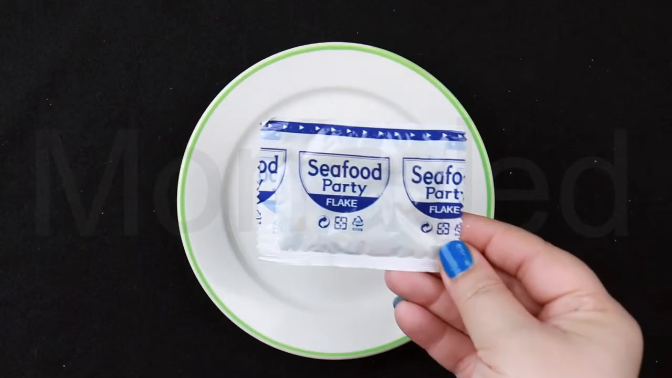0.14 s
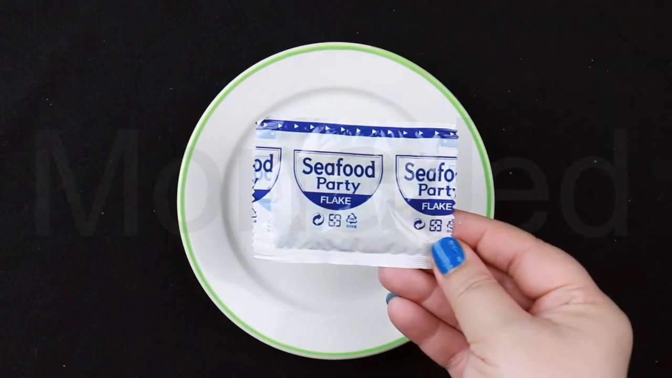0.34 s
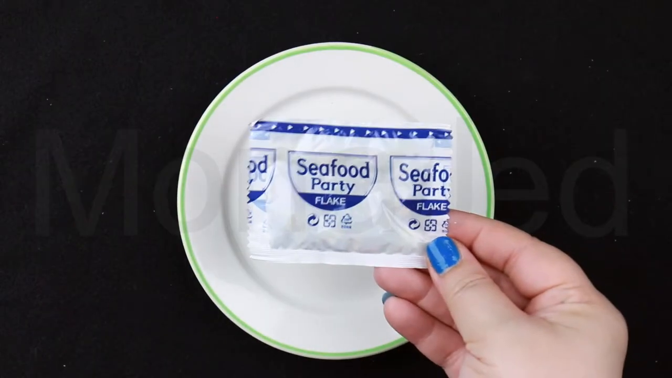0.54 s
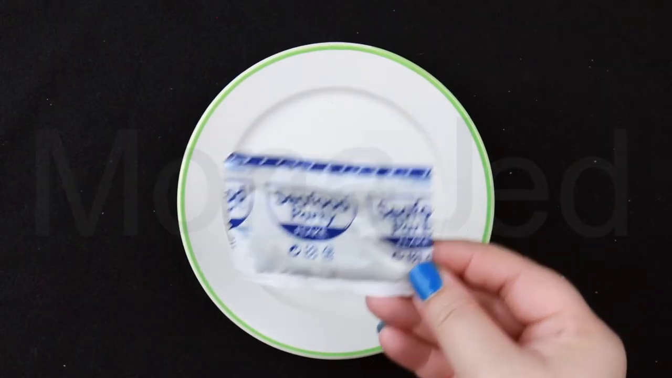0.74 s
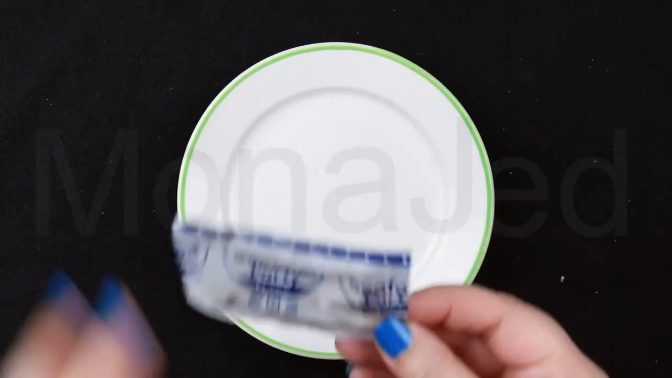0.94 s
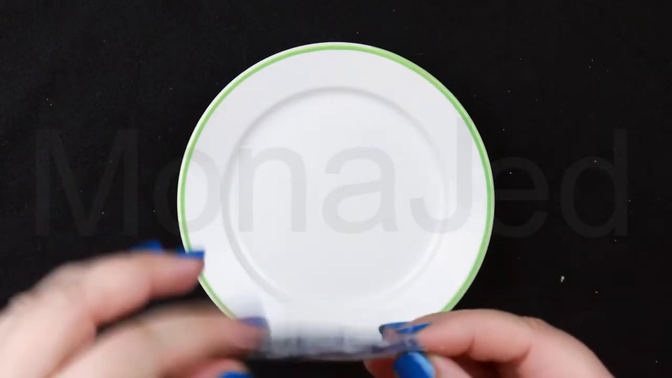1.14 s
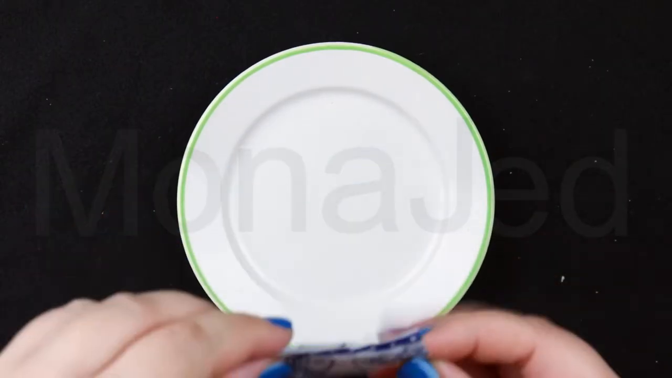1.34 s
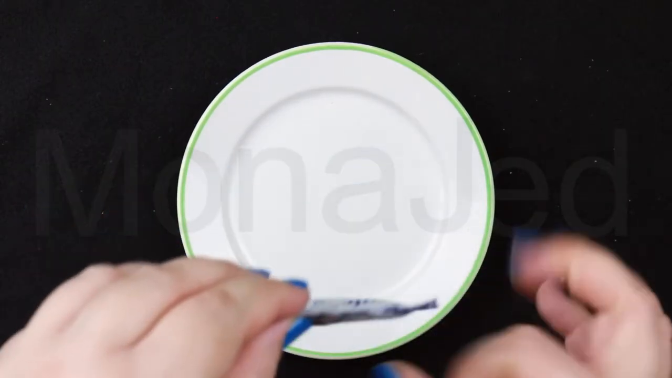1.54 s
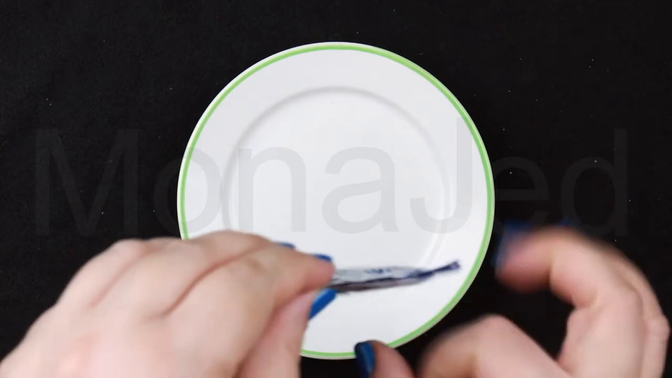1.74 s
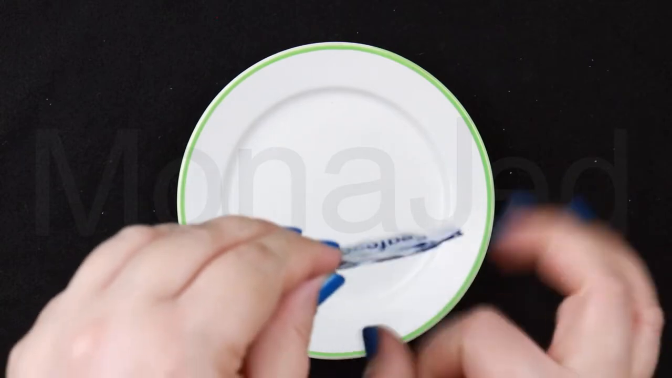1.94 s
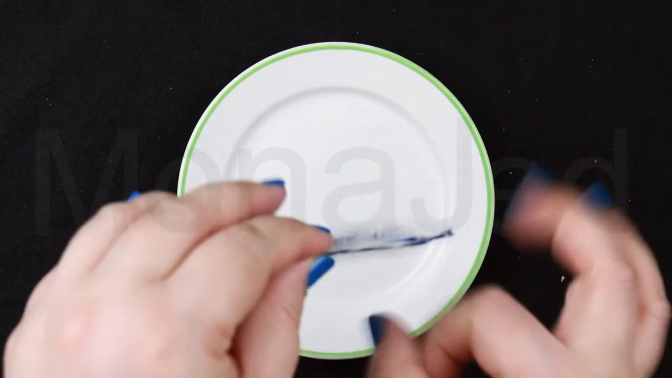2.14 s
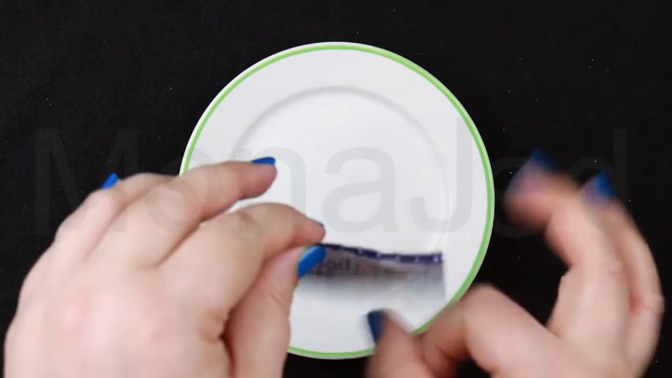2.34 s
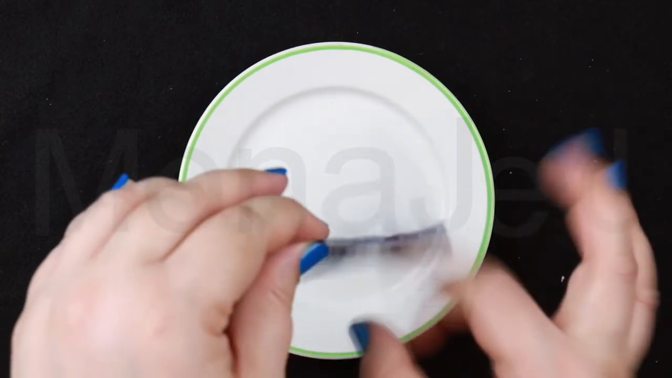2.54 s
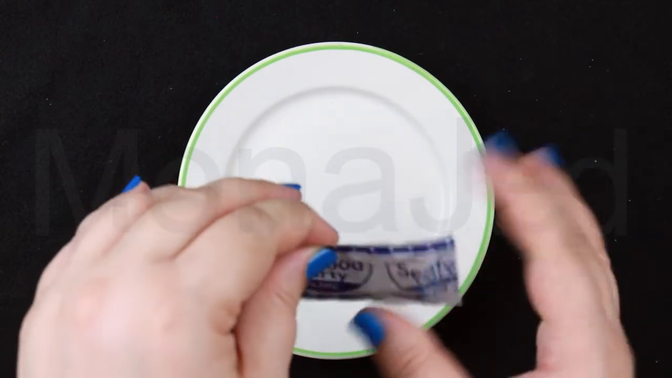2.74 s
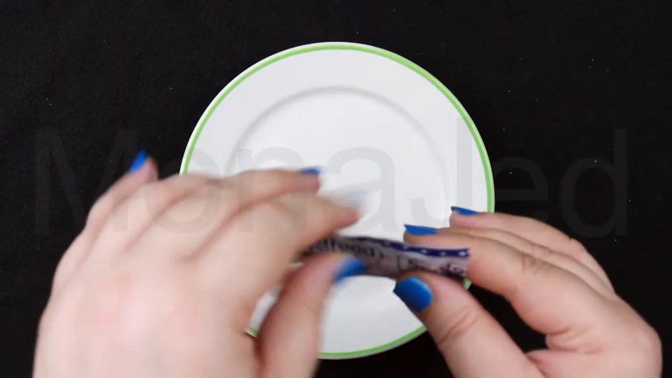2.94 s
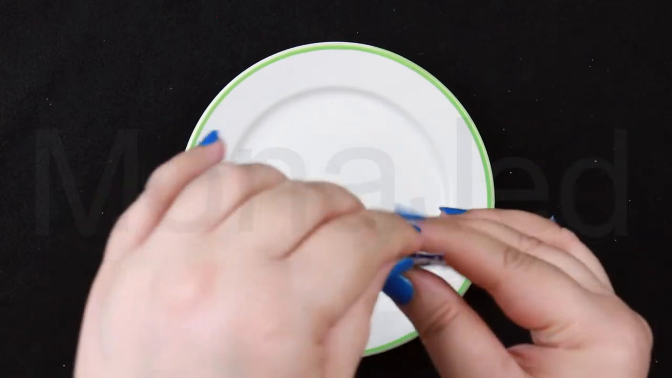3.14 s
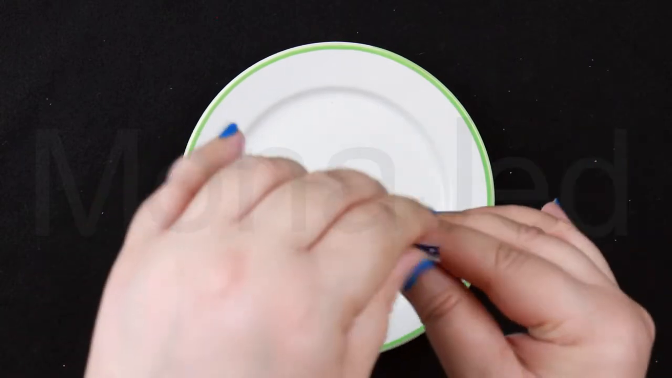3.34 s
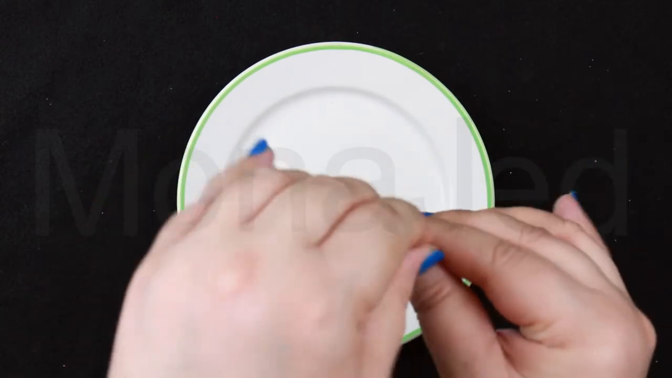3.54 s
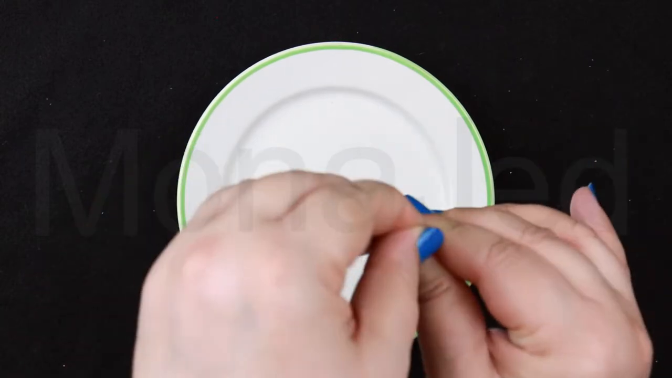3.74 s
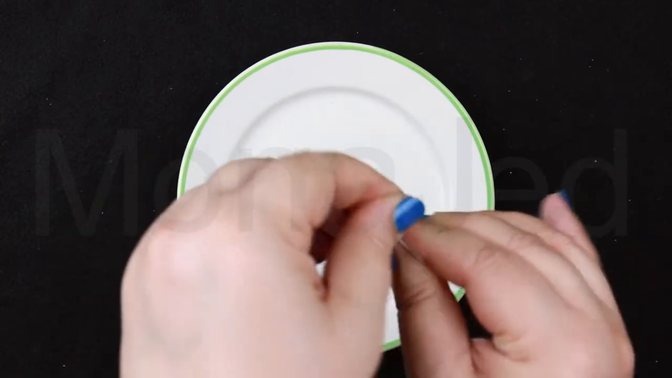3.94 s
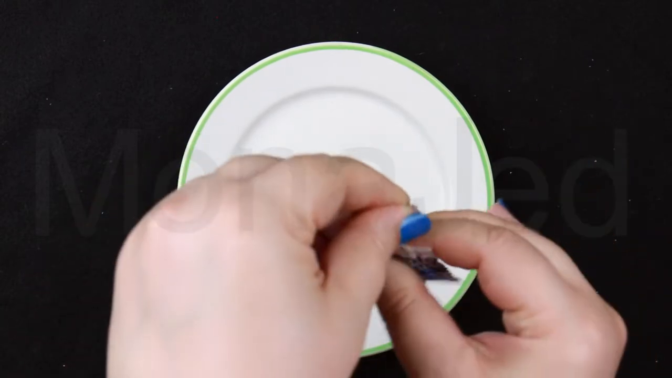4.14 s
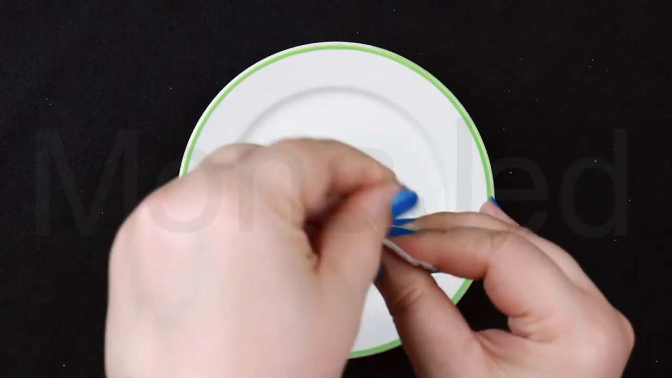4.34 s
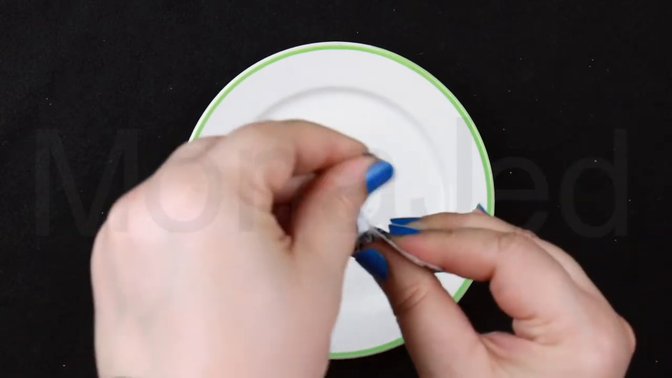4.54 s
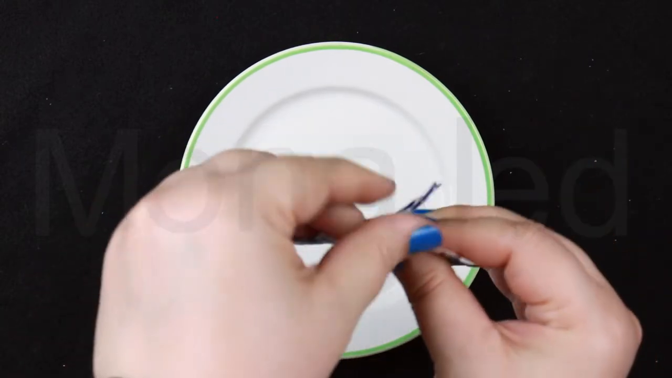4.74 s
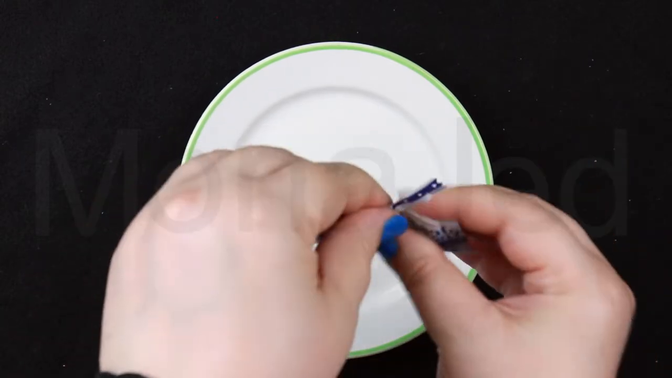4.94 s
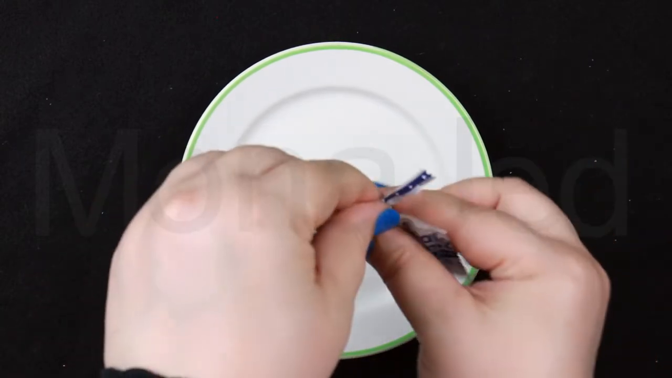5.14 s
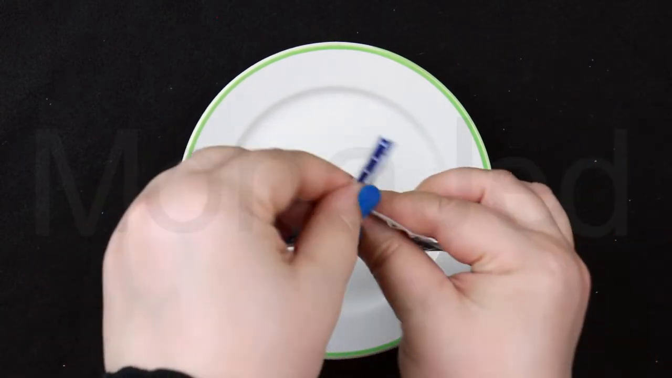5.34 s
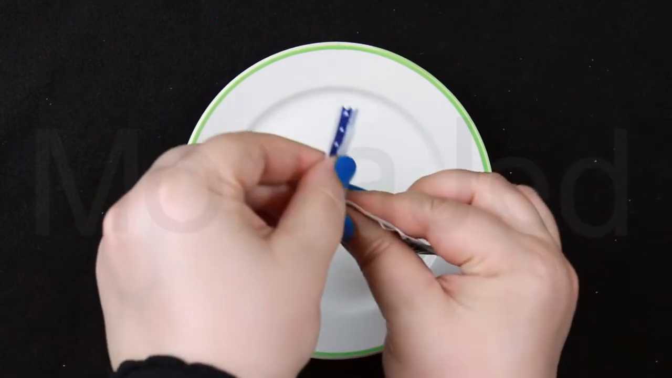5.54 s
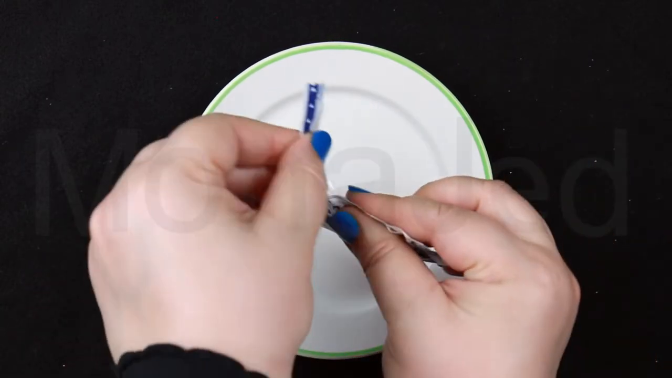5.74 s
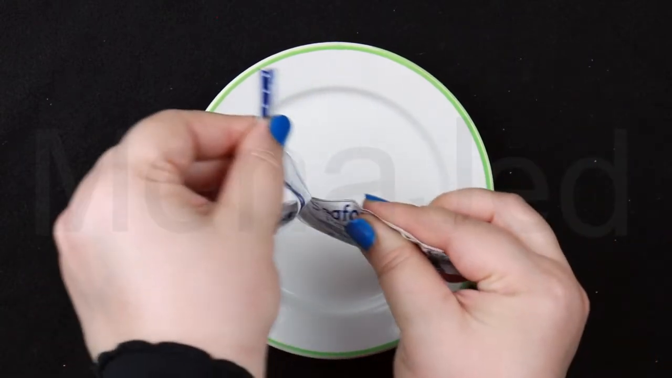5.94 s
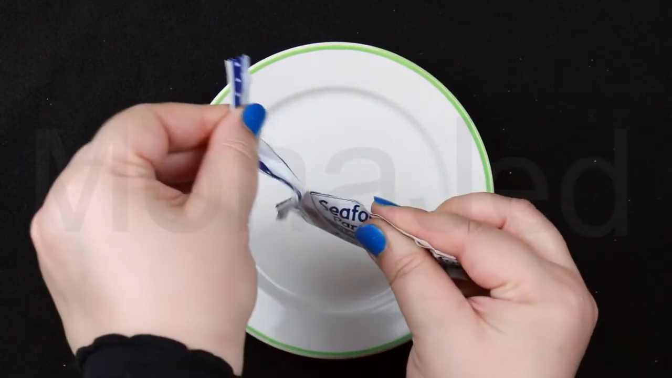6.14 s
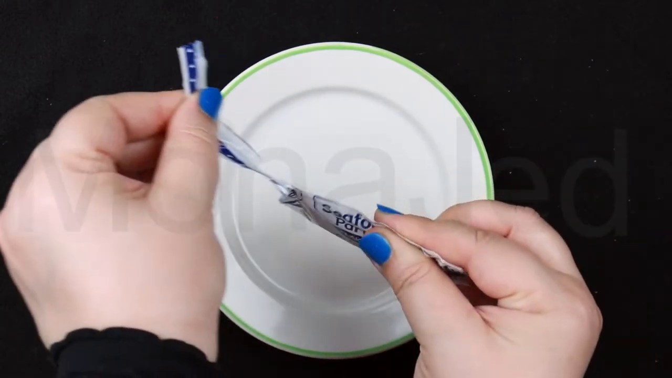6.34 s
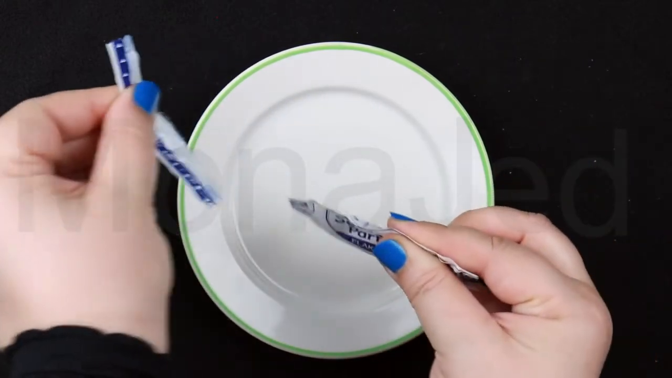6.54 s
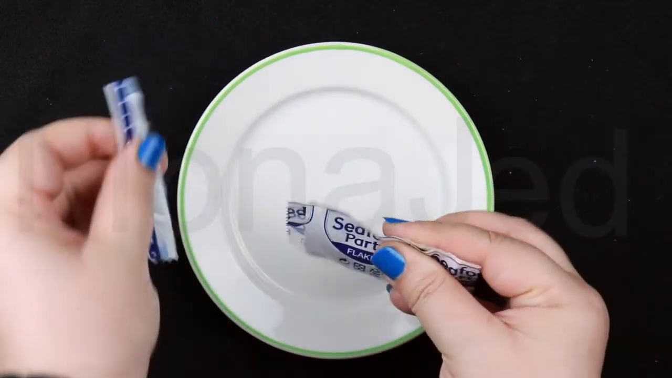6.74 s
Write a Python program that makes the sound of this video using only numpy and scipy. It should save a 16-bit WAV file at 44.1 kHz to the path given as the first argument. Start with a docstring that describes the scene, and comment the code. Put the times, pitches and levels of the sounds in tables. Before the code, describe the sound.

A small foil-plastic sachet scuffs off a plate, gets five sharp fingernail flicks with rattling flakes, then crinkles and tears open in fine crackles.

```python
"""Quiet room air with a faint low hum, then a soft scuff: a small foil-plastic sachet is slid off a plate.
It is flicked five times so that the flakes settle, then pinched and torn open along its top seam.
Buckling film and the tear are short noise bursts through resonances; rustle, flakes and rip are random grains.
Close, near-mono microphone in a small room: the sachet sits in the centre, only a trace of hiss differs
between the channels."""
import sys
import numpy as np
from scipy import signal
from scipy.fft import rfft, irfft, next_fast_len
from scipy.io import wavfile

SR = 44100
rng = np.random.default_rng(int(sys.argv[2]) if len(sys.argv) > 2 else 0)


def log_audio(samples):
    """Write samples as a 16-bit WAV file to the path given in sys.argv[1]."""
    # one column per channel
    frames = np.atleast_2d(samples).T
    # limit to full scale, then quantise
    limited = np.clip(frames, -1, 1)
    pcm = np.round(limited * 32767).astype(np.int16)
    wavfile.write(sys.argv[1], SR, pcm)


N = 303849
TIME = np.arange(N) / SR

# room air, spectrum: (frequency [Hz], relative density [dB per Hz])
AIR = [(25, -7.5), (80, -19), (150, -2), (260, 0.5), (400, 1), (800, -1), (1200, -5), (2000, -9.5),
       (4000, -15), (8000, -21), (16000, -25.5)]
# faint hum in the room: (frequency [Hz], level at the start [dB], change [dB per s])
HUM = [(83.6, -82, 0.55), (131.2, -73, 0.44)]
# hiss that differs between the channels, spectrum: (frequency [Hz], relative density [dB per Hz])
MIC_HISS = [(15, -38), (25, -8), (114, -11), (145, -14), (405, -1), (516, -5), (695, -1), (14000, -13),
            (16000, -17)]
# the room's decay: (frequency [Hz], t60 [s])
ROOM_T60 = [(200, 0.35), (1000, 0.074), (4000, 0.47), (8000, 0.33), (15000, 0.079)]
# the room's colour: (frequency [Hz], relative level [dB])
ROOM_COLOUR = [(150, 18.5), (500, 4), (1500, 10), (3500, 1.5), (6000, -3), (8500, 15), (15000, 3)]
# scuff on the plate, spectrum: (frequency [Hz], relative density [dB per Hz])
SCUFF = [(400, -32.5), (700, -14), (950, -6), (1400, -6), (2300, -8.5), (5000, -9), (8000, -20.5),
         (15000, -34)]
# crinkling film, spectrum: (frequency [Hz], relative density [dB per Hz])
FILM = [(100, -49), (900, -5.5), (1600, -10), (2400, -0.5), (3300, -2.5), (5500, 1), (7000, -6),
        (8500, -18), (12000, -9.5), (16000, -44)]
# fingertips rubbing the film, spectrum: (frequency [Hz], relative density [dB per Hz])
SKIN = [(50, -47), (150, -38), (250, -8.5), (380, 2.5), (800, 8.5), (1200, 2.5), (1900, 4.5), (3200, -23)]
# flakes striking the film, spectrum: (frequency [Hz], relative density [dB per Hz])
FLAKES = [(60, -45), (200, -16), (400, 2), (800, 10.5), (2200, 14), (3500, 12), (6000, 15.5), (8500, 3.5),
          (12000, 0), (16000, -14)]
# firmness of the hold between squeezes, as its rustle: (time [s], relative level [dB])
GRIP = [(0.55, -78.5), (1.15, -59), (1.8, -64), (2.6, -55), (3.1, -62.5), (3.7, -55.5), (4.75, -57),
        (5.5, -56.5), (6.15, -60), (6.89, -61)]
# the fingers squeeze or pull the film:
# (start [s], length [s], fine crinkle [relative dB], skin rubbing [relative dB])
SQUEEZES = [(1.193, .035, -42.5, -44), (1.285, .09, -40, -42), (1.423, .045, -46, -48.5),
            (1.671, .025, -45, -49.5), (1.863, .006, -42, -46.5), (2.383, .025, -44, -47),
            (2.417, .07, -38, -39), (2.702, .07, -47.5, -46.5), (2.953, .06, -48.5, -48),
            (3.196, .045, -48.5, -50), (3.303, .035, -43, -63), (3.585, .08, -48.5, -53.5),
            (3.857, .03, -47.5, -50), (3.98, .045, -47.5, -68), (4.096, .015, -47, -55),
            (4.165, .075, -44.5, -55), (4.465, .04, -48.5, -63), (4.623, .055, -51.5, -54),
            (4.716, .07, -60.5, -55.5), (4.868, .04, -51.5, -52), (4.996, .035, -47, -52),
            (5.15, .045, -47.5, -51.5), (5.284, 0.18, -54, -54), (5.477, .045, -48, -53),
            (5.779, .04, -49.5, -71), (5.916, .09, -46.5, -59), (6.444, .055, -50, -50),
            (6.665, .02, -48.5, -69), (6.806, .04, -48, -56.5)]
# a fingertip bumps the pouch: (time [s], level [dB], pouch mode [Hz], decay of the push [s])
BUMPS = [(1.1935, -41, 895, .008), (1.2855, -41, 990, 0.0055), (1.4097, -48, 1050, .001),
         (1.424, -41, 800, 0.0061), (3.8399, -37, 645, 0.0028), (4.096, -39, 503, 0.0066),
         (4.345, -49, 910, 0.0023), (6.5615, -43, 925, 0.0021)]
# modes of the air-filled pouch that every flick shares: (frequency [Hz], width [Hz], relative level [dB])
POUCH = [(287, 180, -14.5), (509, 240, -14)]
# a fingernail flicks the sachet:
# (time [s], level [dB], ring [Hz], second ring [Hz], its level [dB], third ring [Hz], its level [dB],
#  crumpling [dB re snap], pouch [Hz], lower pouch [Hz], its level [dB], pouch [dB re level],
#  top crack [dB re level], rise [s], decay [s])
FLICKS = [(1.8647, -20.5, 3400, 4200, -1, 6200, -5, 13, 1150, 640, -4, -10.5, -10, 0.0043, 0.0024),
          (2.058, -15, 3180, 5130, -2, 2770, -2, -1, 1250, 698, -5.5, -10, -9.5, 0.00031, 0.0019),
          (2.249, -12, 3460, 2010, -4.5, 4320, -8, 1, 775, 650, -10, -8.5, -9.5, .0014, 0.0016),
          (2.4478, -14, 5980, 4470, -6, 3020, -3.5, 17, 990, 740, -1.5, -11, -10.5, .0003, 0.0053),
          (2.6151, -13, 3520, 4260, -3.5, 7570, -12.5, 1, 1220, 835, 0.5, -10.5, -14.5, 0.00135, 0.0013)]
# the tear creeps along the seam: (start [s], end [s], relative level [dB], ring of the taut film [Hz])
RIPS = [(3.54, 3.774, -53.5, 4300), (3.94, 4.327, -56.5, 4570), (4.422, 4.577, -54, 3500),
        (5.115, 5.643, -57, 3180), (6.295, 6.547, -60, 3420)]
# two modes of the film between the fingers, which move as the grip changes and the tear lengthens:
# (start [s], end [s], lower mode [Hz], its level [dB], upper mode [Hz], its level [dB])
HOLDS = [(1.12, 1.8, 2750, -8, 4200, -29), (3.1, 3.8, 4330, -11, 5800, -14),
         (3.79, 4.595, 3660, -8, 4540, -14), (4.61, 5.66, 3180, -17, 5170, -13),
         (5.638, 6.177, 3350, -13, 5570, -10.5), (6.204, 6.89, 3450, -7.5, 5900, -13)]
# the film buckles or the tear jumps, the loudest times; the first row (0.94 s) is instead a faint tick as the
# sachet lifts off the plate; levels before the common trims in crackles(): # (time [s], relative level [dB],
# panel ring [Hz], low flex [dB], top crack [dB], run of the crease [s])
CRACKLES = [(0.9393, -49.5, 3830, -5, -28, 0.0013), (1.1298, -37.5, 2750, -6, -2, 0.0011),
            (1.1818, -45, 5020, 0, 1, 0.0051), (1.1951, -39.5, 4520, 2, 0, 0.0055),
            (1.2053, -39, 3120, 2.5, -2, 0.0085), (1.2319, -50, 2990, 6, 0, 0.0018),
            (1.2851, -32, 4150, -11, -12, 0.0058), (1.3164, -34, 5750, -20, -13, 0.0016),
            (1.3244, -33, 5840, -18, -18, 0.005), (1.3332, -39, 5680, -8, -10, 0.0015),
            (1.3618, -29.5, 4720, -9, -11, 0.0064), (1.3723, -37, 3950, -15, -3, 0.0045),
            (1.4105, -36.5, 2860, -6, -18, 0.0013), (1.4244, -41.5, 3120, -8, -3, 0.0056),
            (1.4493, -41.0, 2930, -11, -8, 0.0057), (1.4561, -44.5, 2930, -6, -12, 0.0045),
            (1.4688, -49, 2990, -13, -8, 0.0003), (1.5101, -37, 3550, -13, -7.5, 0.0065),
            (1.6251, -49.5, 2860, 1, -8, 0.0031), (1.6718, -47.5, 2410, 7.5, -2, 0.0045),
            (1.6899, -41, 3100, -11, -11, 0.0004), (1.7352, -41.5, 4520, -7.5, -3.5, 0.0035),
            (1.9226, -40, 3660, -1, -3, 0.0064), (2.1183, -40, 2780, -4, -8, 0.0029),
            (2.1503, -31, 5680, -13, -23, 0.0022), (2.1992, -39.5, 4520, -7, -7, 0.0041),
            (2.2144, -39, 4010, -7, -5, 0.0021), (2.2203, -39, 3700, -8, -3, 0.0059),
            (2.2951, -35, 4160, -18, -15, 0.0017), (2.3301, -28.5, 4470, -22, -20, 0.0012),
            (2.3656, -35.5, 4410, -5, -21, 0.0015), (2.3943, -34.5, 4610, -13, -8, 0.00024),
            (2.4221, -34.5, 4050, -19, -12, 0.0075), (2.4325, -30, 5300, -11, -10, 0.0038),
            (2.4846, -29.5, 5190, -3.5, -1, 0.005), (2.5005, -33, 5700, -19, -15, 0.00064),
            (2.5183, -39, 5790, -15, -1, 0.005), (2.5717, -52, 6090, -15, -8, 0.0003),
            (2.5929, -36, 4130, -6, -9, 0.006), (2.6012, -33.5, 5790, -12, -8, 0.0018),
            (2.6587, -47, 2430, -14, 13, 0.0016), (2.6947, -41, 3680, -15, -12, 0.0022),
            (2.6987, -41, 3250, -5, -13, 0.0048), (2.7278, -33.5, 4500, -9, -8, 0.0016),
            (2.7521, -38, 4370, -6, 2, 0.0021), (2.7701, -43, 3490, -14, -14, 0.0017),
            (2.785, -36.5, 4330, -21, -12, 0.0013), (2.8041, -42, 3850, -4, -17, 0.0016),
            (2.8935, -42, 4270, -12, -15, 0.0026), (2.9841, -45, 5120, -14, -14, 0.0021),
            (2.9936, -35.5, 4300, -11, -1, 0.0035), (3.0064, -42, 3360, -6, -17, 0.0063),
            (3.0362, -42.5, 5840, -8, -5, 0.0014), (3.1943, -39.5, 4560, -21, 0.5, 0.0022),
            (3.2162, -35, 4050, -10, -8, 0.0036), (3.2342, -41.5, 4330, -13, -12, 0.0026),
            (3.3062, -36.5, 3800, -1, -11, 0.0017), (3.3159, -37, 6160, -21, -1, 0.0015),
            (3.3225, -41, 6200, -11, -1, 0.0017), (3.3272, -37.5, 5070, -13, -8, 0.0017),
            (3.3679, -45.5, 2410, -1, -8, 0.0041), (3.434, -39.5, 5880, -18, -19, 0.00036),
            (3.4833, -39.0, 4110, -3.5, -9, 0.003), (3.5672, -42.5, 4390, -3, -12, 0.0021),
            (3.5772, -38, 4480, -13, -9, 0.0022), (3.582, -35.5, 4160, -8, -8, 0.0034),
            (3.5896, -34, 4440, -13, -4, 0.0025), (3.5999, -31.5, 4500, -25, -11, 0.0032),
            (3.6112, -39.5, 5860, -23, 6, 0.003), (3.6559, -42.5, 4480, -20, -16, 0.003),
            (3.7016, -42.5, 3730, -10, -24, 0.0035), (3.7411, -44, 3900, -12, -15, 0.0019),
            (3.7785, -34.5, 4330, -7, -19, 0.0027), (3.8411, -34.5, 4460, -5.5, -4, 0.0077),
            (3.8859, -48, 3790, -12, -9, 0.0021), (3.8932, -46, 4350, -9, 3, 0.00036),
            (3.9078, -40.5, 4440, -12, -18, 0.0026), (3.9133, -45, 2410, -2, -8, 0.0065),
            (3.9668, -36.5, 4590, -11, -5, 0.0017), (3.9751, -24.0, 4300, -27, -24, 0.0018),
            (4.0005, -46, 4630, -18, -11, 0.0004), (4.0141, -30.5, 4400, -19, -9, 0.0028),
            (4.0364, -46, 5680, -15, 0, 0.0018), (4.0955, -47, 4760, -7, 1, 0.0063),
            (4.1037, -43, 4240, -6, 1, 0.0056), (4.1293, -57, 3790, -7, -15, 0.0032),
            (4.1556, -51, 4610, 5, -16, 0.0015), (4.1797, -30.5, 3570, -8, -20, 0.0026),
            (4.1901, -34, 3680, -5, -11, 0.0015), (4.1999, -44, 4240, -19, -16, 0.0023),
            (4.2225, -46, 3620, -4, -9, 0.0021), (4.2304, -43, 4100, -6, -14, 0.0017),
            (4.2456, -40, 4500, 0.5, -8, 0.0022), (4.2832, -35, 4520, -16, -25, 0.0021),
            (4.309, -41.5, 4650, -20, -11, 0.0019), (4.3451, -38, 4760, -4.5, -6, 0.0023),
            (4.4176, -36.0, 4370, -18, -26, 0.0036), (4.4261, -45, 6050, -11, 2, 0.002),
            (4.4342, -35.5, 4670, -11, -20, 0.0012), (4.4443, -41, 4740, -7, -13, 0.0013),
            (4.4737, -36.5, 3620, -13, -9, 0.0019), (4.4824, -45, 3640, -8, -10, 0.0015),
            (4.4899, -40, 3640, -1, -1, 0.0015), (4.498, -38.5, 3770, -5, -2, 0.0014),
            (4.5055, -37.5, 3620, -9, -20, 0.0012), (4.5227, -44, 3920, -4, -13, 0.0022),
            (4.5521, -41, 3730, -3, -1, 0.0036), (4.5755, -50, 3920, -3, -15, 0.0015),
            (4.6167, -44.0, 3850, -1, -9, 0.0031), (4.642, -40.5, 5600, -8, -13, 0.0033),
            (4.6676, -44.5, 3920, 1, 2, 0.002), (4.6911, -41, 6200, -21, -4, 0.0028),
            (4.8087, -53, 3940, -13, -12, 0.0019), (4.8257, -49, 3320, -3, 0, 0.0024),
            (4.8536, -36.5, 4300, -10, -7, 0.002), (4.8838, -36, 4080, -4, -10, 0.0018),
            (4.9273, -54, 3130, -7, 5, 0.0025), (4.9371, -50, 6520, -14, 3, 0.0004),
            (4.9418, -39.5, 5680, -6, -13, 0.0018), (4.9595, -40.5, 4690, -10, -3, 0.0018),
            (5.0183, -41.5, 3360, 0, -5, 0.0051), (5.0241, -35, 5500, -5, -19, 0.002),
            (5.0897, -45.5, 3960, -8, -25, 0.0026), (5.1294, -44, 3320, -10, -16, 0.0033),
            (5.1554, -40.5, 3190, -18, -17, 0.0015), (5.1679, -47, 2950, -11, -21, 0.0011),
            (5.1808, -37, 4330, -6, -6, 0.0027), (5.2073, -44, 5900, -6, -9, 0.0017),
            (5.2115, -42, 2990, -3, -8, 0.0014), (5.2452, -44, 3250, -8, -14, 0.0023),
            (5.2594, -43, 3080, -19, -12, 0.0027), (5.2896, -47, 3380, -2, -5, 0.0029),
            (5.3174, -38.5, 2860, -4, -6, 0.0037), (5.3338, -50, 3080, -10, -22, 0.0013),
            (5.3539, -43.5, 3510, -7, 2, 0.0029), (5.3861, -49, 2930, 2, -14, 0.0018),
            (5.3937, -35, 3100, -8, -10, 0.0017), (5.3976, -39, 3170, -11, -15, 0.0035),
            (5.427, -41, 3170, -12, -11, 0.004), (5.4326, -40, 3360, -21, -9, 0.0028),
            (5.4739, -38, 3400, 0, -12, 0.0028), (5.4777, -34, 3140, -12, -5, 0.0028),
            (5.4854, -49, 4240, -16, 3, 0.0022), (5.5063, -33.5, 3010, -1, -25, 0.0029),
            (5.5406, -51, 3140, -16, -16, 0.0019), (5.5629, -33.0, 5210, -15, -19, 0.00069),
            (5.5676, -29.5, 5160, -26, -7, 0.0017), (5.5744, -31, 3460, -10.5, -17, 0.0011),
            (5.5912, -41, 5230, -22, 4, 0.00095), (5.604, -34.5, 6440, -7, -8, 0.0037),
            (5.6106, -36.5, 3320, 0.5, -9, 0.0015), (5.6308, -41.5, 5230, -13, -18, 0.0011),
            (5.7184, -48, 5040, -1, -17, 0.0032), (5.7668, -28.0, 3450, -12.5, -9.5, 0.003),
            (5.793, -33.5, 4100, -17, -3.5, 0.0006), (5.8175, -46, 3380, -13, -10, 0.0014),
            (5.8235, -53, 5770, -13, -9, 0.0009), (5.8355, -54, 5000, -15, 0, 0.0009),
            (5.8896, -39.0, 3450, -11, -4, 0.0012), (5.8932, -46, 3210, -3, -4, 0.0032),
            (5.911, -38.0, 3770, -5, -14, 0.0011), (5.9241, -39, 6090, -3, -11, 0.0029),
            (5.93, -40.5, 5600, -6, -5, 0.0004), (5.9561, -40.5, 5770, 3, -7, 0.0027),
            (5.9669, -37.5, 5960, -12, 2.5, 0.0019), (5.993, -40, 3210, 1.5, -15, 0.0011),
            (6.0224, -45, 4670, 0, -1, 0.0017), (6.0391, -42.5, 4350, -6, -16, 0.0012),
            (6.0728, -42.5, 4350, -14, -3, 0.005), (6.0934, -49.5, 3790, -16, -11, 0.0012),
            (6.1506, -46.0, 4500, -4, -10, 0.0028), (6.2272, -51.0, 4460, -5, -1, 0.0019),
            (6.2413, -50.0, 3830, -1, -5, 0.00042), (6.3058, -39.5, 3800, -11, -4, 0.0012),
            (6.3201, -39.5, 3600, -13, -18, 0.0015), (6.3465, -39.5, 3530, -4, -4, 0.0025),
            (6.3575, -36.5, 3370, -4.5, -28, 0.0021), (6.4069, -48.5, 3570, 3, -5, 0.0013),
            (6.4387, -35.0, 2360, -3.5, -19, 0.00074), (6.4586, -45.0, 3790, -6, -3, 0.0043),
            (6.4914, -40.5, 3620, -5, -5, 0.0046), (6.5054, -45.0, 3210, 1, -8, 0.0011),
            (6.5307, -52, 4720, -10, -7, 0.0012), (6.5609, -46.5, 2410, 7.5, -31, 0.0027),
            (6.5889, -48, 3680, 2, -9, 0.0021), (6.6641, -48, 4460, -1, -9, 0.0035),
            (6.6737, -48.5, 4630, -1, 2, 0.0054), (6.7532, -39, 4630, -17, -14, 0.0017),
            (6.8107, -34, 6060, -2.5, -3, 0.0042), (6.8698, -47.5, 5600, -3, 1, 0.0027)]

AIR_DB, HISS_DB = -56, -64
SLIDE_START_S, SLIDE_LENGTH_S, SLIDE_ATTACK_S, SLIDE_RELEASE_S = 0.755, 0.1, 0.036, 0.042
SQUEEZE_ATTACK_S, SQUEEZE_RELEASE_S = 0.012, 0.024
GRIP_RUB_DB = 1.5  # rubbing relative to crinkle in the steady hold
# fine crinkle: tick rate, unevenness of the sizes, decay of each tick, smooth share, wavering of the pressure
TICKS_PER_S, TICK_SPREAD_DB, TICK_S, FRICTION_SHARE, PATCHY_DB = 800, 5.8, 0.0006, 0.22, 1.5
# even rustle after a flick: levels relative to the flick
FLUTTER_CRINKLE_DB, FLUTTER_RUB_DB, FLUTTER_S = -28.5, -29, 0.074
FLUTTER_PER_S, FLUTTER_SPREAD_DB = 5000, 2.5
# flakes pattering down, and the moment they need to reach the film after the nail
PATTER_PER_S, PATTER_SPREAD_DB, FLAKE_FLIGHT_S = 900, 4.5, 0.004
# the pinched seam strains before it gives way
STRAIN_START_S, STRAIN_LENGTH_S, STRAIN_ATTACK_S, STRAIN_RELEASE_S = 3.93, 0.53, 0.23, 0.15
# the dented film pops back after a flick: levels relative to the flick
RELAX_COUNT, RELAX_FIRST_S, RELAX_LAST_S = 12, 0.012, 0.12
RELAX_DB, RELAX_DB_PER_S, RELAX_RUN_S = -40, -78, 0.00065
JUMPS_PER_S, JUMP_SPREAD_DB = 260, 5.5  # jumps of the tear
LESSER_COUNT, LESSER_SPREAD_DB, LESSER_RING_HZ, LESSER_RUN_S = 170, 3, 3800, 0.00088
LOWEST_HZ = 150  # the small sachet radiates little bass below this
CUTOFF_HZ = 16100


def from_db(db):
    """Decibels to gain."""
    return 10 ** (np.asarray(db) / 20)


def rms_one(x):
    """Scale to rms 1."""
    return x / np.sqrt(np.mean(x ** 2) + 1e-20)


def in_time(rows):
    """Each column of a curve, sample by sample."""
    s, *columns = np.transpose(rows)
    return [np.interp(TIME, s, column) for column in columns]


def at_hz(points, hz):
    """Read a spectrum on a log-frequency axis."""
    f, value = np.transpose(points)
    return np.interp(np.log(np.maximum(hz, 1)), np.log(f), value)


def coloured(x, spectrum):
    """Give a steady signal a spectrum; rms 1."""
    size = next_fast_len(len(x))
    gain = from_db(at_hz(spectrum, np.fft.rfftfreq(size, 1 / SR)))
    return rms_one(irfft(rfft(x, size) * gain, size)[:len(x)])


def band(x, low_hz, high_hz, order=2):
    """Causal band-pass."""
    return signal.sosfilt(signal.butter(order, [low_hz, high_hz], "band", fs=SR, output="sos"), x)


def resonance(x, hz, width_hz):
    """One resonance, gain 1 on top."""
    r = np.exp(-np.pi * width_hz / SR)
    feedback = [1, -2 * r * np.cos(2 * np.pi * hz / SR), r * r]
    return signal.lfilter(np.array([1, 0, -1]) * (1 - r * r) / 2, feedback, x)


def drift(rate):
    """Slow chance with spread 1, from random knots at a rate per second."""
    knots = rng.standard_normal(4096)
    return rms_one(np.interp(TIME * rate, np.arange(len(knots)), knots))


def as_hit(x):
    """Scale each short sound to the energy of 4 ms at rms 1."""
    energy = np.sum(x ** 2, axis=-1, keepdims=True)
    return x * np.sqrt(0.004 * SR / (energy + 1e-20))


def add(out, s, sound):
    """Mix a sound in at a time."""
    i = max(round(s * SR), 0)
    out[i:i + len(sound)] += sound[:max(N - i, 0)]


def grains(per_s, spread_db):
    """Random single-sample clicks of either sign; a wider spread makes their sizes less even."""
    sizes = from_db(spread_db * np.minimum(rng.exponential(1, N), 4))
    return (rng.random(N) < per_s / SR) * sizes * rng.choice([-1, 1], N)


def swell(start_s, length_s, attack_s, release_s):
    """Grow exponentially to 1, hold, die away."""
    outside = np.maximum((start_s - TIME) / attack_s, (TIME - start_s - length_s) / release_s)
    return np.exp(-np.clip(outside, 0, 20))


def driven(force, modes, rough_db=0, lag_cycles=0.45):
    """Modes (Hz, width Hz, dB) with deep valleys between them: the film snaps through at the height of the force,
    its low modes last, amid rough crumpling."""
    out = 0
    for hz, width, db in modes:
        lag = round(lag_cycles * SR / hz)
        snap = np.arange(len(force)) == np.argmax(force) + lag
        pushes = np.array([snap, rng.standard_normal(len(force)) * force])
        ring, crumpling = as_hit(resonance(resonance(pushes, hz, width), hz, width))
        out = out + from_db(db) * as_hit(ring + from_db(rough_db) * crumpling)
    return out


def background():
    """Shaped noise for room air, narrow noise for low hum, and hiss of opposite sign in the two channels."""
    out = from_db(AIR_DB) * coloured(rng.standard_normal(N), AIR)
    for hz, db, db_per_s in HUM:
        hum = resonance(resonance(rng.standard_normal(N), hz, 25), hz, 25)
        out += from_db(db + db_per_s * TIME) * rms_one(hum)
    hiss = from_db(HISS_DB) * coloured(rng.standard_normal(N), MIC_HISS)
    return out + hiss * np.array([[1], [-1]])


def room(x, near_db=-15, near_s=0.0024, far_db=-13):
    """Plate, hands and table scatter the sound at once; the walls add a short tail."""
    t = TIME[:SR // 2]
    edges = np.geomspace(100, 17000, 10)
    tail = 0
    for low, high in zip(edges, edges[1:]):
        hz = np.sqrt(low * high)
        fading = from_db(at_hz(ROOM_COLOUR, hz) - 60 * t / at_hz(ROOM_T60, hz))
        tail = tail + band(rng.standard_normal(len(t)), low, high) * fading
    tail = tail * (t > 0.005)
    scatter = rng.standard_normal(len(t)) * (t > 0.0015) * np.exp(-t / near_s)
    near = band(scatter, 160, 7600, order=1)
    echoes = from_db(near_db) * near / np.linalg.norm(near) + from_db(far_db) * tail / np.linalg.norm(tail)
    return signal.fftconvolve(x, echoes)[:N]


def slide(scuff_db=-52.5, hollow_db=-51.5, gap_hz=900, rise_hz_per_s=3200, gap_width_hz=650):
    """The sachet scuffs softly across the glazed plate; the hollow under it rises in pitch as it lifts."""
    touching = swell(SLIDE_START_S, SLIDE_LENGTH_S, SLIDE_ATTACK_S, SLIDE_RELEASE_S)
    hz = gap_hz + rise_hz_per_s * np.clip(TIME - SLIDE_START_S, 0, SLIDE_LENGTH_S)
    # low-passed grains on a gliding carrier make a moving band of noise
    lowpass = signal.butter(2, gap_width_hz / 2, fs=SR, output="sos")
    ringing = signal.sosfilt(lowpass, grains(per_s=17000, spread_db=0.5))
    hollow = ringing * np.sin(2 * np.pi * np.cumsum(hz) / SR)
    scuff = coloured(grains(per_s=6500, spread_db=2), SCUFF)
    return touching * (from_db(scuff_db) * scuff + from_db(hollow_db) * rms_one(hollow))


def finger_work():
    """Gains of crinkle and rubbing: the powers of the steady hold and each squeeze add up."""
    grip, = in_time(GRIP)
    power = from_db([grip, grip + GRIP_RUB_DB]) ** 2
    for s, length, crinkle_db, rub_db in SQUEEZES:
        squeeze = swell(s, length, SQUEEZE_ATTACK_S, SQUEEZE_RELEASE_S)
        power += (from_db([[crinkle_db], [rub_db]]) * squeeze) ** 2
    return np.sqrt(power)


def handling(crinkle_gain, rub_gain):
    """Tiny creases tick in the film while the fingertips rub over it; every tick is a very short run of slips."""
    starts = np.abs(grains(TICKS_PER_S, TICK_SPREAD_DB)) + 1e-18
    ticks = signal.lfilter([1], [1, -np.exp(-1 / (TICK_S * SR))], starts)
    friction = rms_one(rms_one(ticks) + FRICTION_SHARE)
    crinkle = coloured(friction * rng.standard_normal(N), FILM) * crinkle_gain
    rub = coloured((friction + 0.64) * rng.standard_normal(N), SKIN) * rub_gain  # rubbing is smoother
    return (crinkle + rub) * from_db(PATCHY_DB * drift(45))


def flutter():
    """After each flick the film rustles on in dense, even grains and dies away."""
    gain = 0
    for s, db, *_, rise, decay in FLICKS:
        gain = gain + from_db(db) * swell(s + rise, decay, rise, FLUTTER_S)
    crinkle = from_db(FLUTTER_CRINKLE_DB) * coloured(grains(FLUTTER_PER_S, FLUTTER_SPREAD_DB), FILM)
    rub = from_db(FLUTTER_RUB_DB) * coloured(grains(FLUTTER_PER_S, FLUTTER_SPREAD_DB), SKIN)
    return gain * (crinkle + rub)


def flakes(shake_db=-4.5, shake_s=0.012, settle_db=-28, settle_s=0.13):
    """Each flick throws the flakes against the film in a dense rush; they patter back down more sparsely."""
    thrown, falling = np.zeros((2, N))
    t = TIME[:SR // 2]
    arriving = 1 - np.exp(-(t / FLAKE_FLIGHT_S) ** 2)
    for s, db, *_, rise, decay in FLICKS:
        add(thrown, s + rise, from_db(db + shake_db) * arriving * np.exp(-t / shake_s))
        add(falling, s + rise, from_db(db + settle_db) * np.exp(-t / settle_s))
    rush = coloured(grains(per_s=5100, spread_db=2.5), FLAKES)
    patter = coloured(grains(PATTER_PER_S, PATTER_SPREAD_DB), FLAKES)
    return thrown * rush + falling * patter


def bumps(width_hz=480, rough_db=-2):
    """A soft fingertip knocks the air-filled pouch: a decaying push rings one mode."""
    t = TIME[:SR // 20]
    out = np.zeros(N)
    for s, db, hz, decay in BUMPS:
        knock = driven(np.exp(-t / decay), [(hz, width_hz, 0)], rough_db)
        add(out, s, from_db(db) * as_hit(band(knock, 320, 1650)))
    return out


def strain(level_db=-58.5, hz=410, width_hz=300):
    """The taut seam creaks dully between the fingertips: grains through a low resonance."""
    pinched = swell(STRAIN_START_S, STRAIN_LENGTH_S, STRAIN_ATTACK_S, STRAIN_RELEASE_S)
    creak = band(resonance(grains(per_s=280, spread_db=0.5), hz, width_hz), 290, 540)
    return pinched * from_db(level_db) * rms_one(creak)


def flicks(ring_width_hz=850, broad_db=-12, pouch_width_hz=420, graze_db=-30, graze_s=0.0016):
    """The nail grazes the film, crumples it in a few ms and thumps the air-filled pouch."""
    t = np.arange(round(0.05 * SR)) / SR - graze_s
    out = np.zeros(N)
    for (s, db, hz, second_hz, second_db, third_hz, third_db, rough_db,
         pouch_hz, lower_hz, lower_db, low_db, top_db, rise, decay) in FLICKS:
        press = np.maximum(t / rise, from_db(graze_db))
        force = np.minimum(press, np.exp((rise - t) / decay))
        crumple = rng.standard_normal(len(t)) * force
        modes = [(hz, ring_width_hz, 0), (second_hz, ring_width_hz, second_db),
                 (third_hz, ring_width_hz, third_db)]
        ring = band(driven(force, modes, rough_db), 690, 10000)
        panel = as_hit(ring + from_db(broad_db) * as_hit(band(crumple, 2400, 6200)))
        knock = list(POUCH) + [(pouch_hz, pouch_width_hz, 0), (lower_hz, pouch_width_hz, lower_db)]
        pouch = as_hit(band(driven(force, knock, rough_db=-3.5, lag_cycles=0.35), 225, 1800))
        crack = as_hit(band(crumple, 7500, 11600))
        add(out, s - graze_s, from_db(db) * (panel + from_db(low_db) * pouch + from_db(top_db) * crack))
    return out


def relaxing(spread_db=4.0, ring_hz=4200, ring_octaves=0.35, flex_db=-9, crack_db=-8):
    """Rows like CRACKLES: the dented film pops back in ticks, sparser and on average softer as it settles."""
    rows = []
    for s, db, *_ in FLICKS:
        for k in range(RELAX_COUNT):
            step = (k + rng.random()) / RELAX_COUNT
            wait = RELAX_FIRST_S * (RELAX_LAST_S / RELAX_FIRST_S) ** step
            size, ring = rng.standard_normal(2)
            level = db + RELAX_DB + RELAX_DB_PER_S * wait + spread_db * size
            hz = ring_hz * 2 ** (ring_octaves * ring)
            rows.append((s + wait, level, hz, flex_db, crack_db, RELAX_RUN_S))
    return rows


def rips(ring_width_hz=700, dry_db=-8, fade_s=0.025, strip_hz=1720, strip_width_hz=600, strip_db=-7):
    """The tear advances in tiny jumps, each plucking the taut film and the loose strip: a fine rasp."""
    jumps = band(grains(JUMPS_PER_S, JUMP_SPREAD_DB), 1200, 7200)
    strip = rms_one(resonance(jumps, strip_hz, strip_width_hz))
    loose = from_db(strip_db) * strip + from_db(dry_db) * rms_one(jumps)
    out = np.zeros(N)
    for start, end, db, hz in RIPS:
        pull = np.clip(np.minimum(TIME - start, end - TIME) / fade_s, 0, 1)
        taut = rms_one(resonance(jumps, hz, ring_width_hz))
        out += pull * from_db(db) * (taut - loose)
    return out


def lesser_crackles(work, level_db=-54, follows=0.15, ring_octaves=0.21, flex_db=-8, crack_db=-9,
                    colour_db=1.5, busy_db=-49):
    """Rows like CRACKLES, by chance: harder work makes them more frequent and louder, up to a limit."""
    effort = np.minimum(work / from_db(busy_db), 1)
    chance = np.cumsum(effort)
    draws = (np.arange(LESSER_COUNT) + rng.random(LESSER_COUNT)) / LESSER_COUNT
    at = np.searchsorted(chance, chance[-1] * draws)
    size, ring, flex, crack = rng.standard_normal((LESSER_COUNT, 4)).T
    db = level_db + follows * 20 * np.log10(effort[at]) + LESSER_SPREAD_DB * size
    hz = LESSER_RING_HZ * 2 ** (ring_octaves * ring)
    run = np.full(LESSER_COUNT, LESSER_RUN_S)
    return np.transpose([TIME[at], db, hz, flex_db + colour_db * flex, crack_db + colour_db * crack, run])


def crackles(rows, snap=2.6, after_s=0.018, after_db=-24, ring_width_hz=1100,
             ring_db=1, flex_db=2, crack_db=-0.5):
    """The film snaps, a crease runs across it for a few ms at most, and the freed panel rings briefly."""
    t = np.arange(round(0.016 * SR)) / SR
    runs = np.maximum(np.array(rows)[:, 5:], 1 / SR)  # short creases snap, long ones zip
    fading = np.exp(-(t / runs) ** 2) + from_db(after_db) * np.exp(-t / after_s)
    slip = rng.standard_normal((len(rows), len(t))) * fading
    slip[:, 4] = snap * rng.choice([-1, 1], len(rows))
    broad = as_hit(band(slip, 2920, 6900))
    flex = as_hit(band(slip, 685, 2370))
    crack = as_hit(band(slip, 7560, 13900))
    out = np.zeros(N)
    for k, (s, db, hz, low_db, top_db, _) in enumerate(rows):
        panel = as_hit(as_hit(resonance(broad[k], hz, ring_width_hz)) + broad[k])
        sound = from_db(ring_db) * panel
        sound = sound - from_db(low_db + flex_db) * flex[k]
        sound = sound - from_db(top_db + crack_db) * crack[k]
        add(out, s, from_db(db) * sound)
    return out


def held_film(x, direct_db=-3.5, width_hz=480):
    """Handling, rips and crackles also set the two modes of the held film ringing, hold by hold."""
    out = from_db(direct_db) * x
    for start, end, low_hz, low_db, high_hz, high_db in HOLDS:
        held = x * ((TIME >= start) & (TIME < end)) + 1e-18
        out = out + from_db(low_db) * resonance(held, low_hz, width_hz)
        out = out + from_db(high_db) * resonance(held, high_hz, width_hz)
    return out


def scene():
    """The sachet in the centre, the room around it."""
    crinkle, rub = finger_work()
    handled = handling(crinkle, rub) + rips() + crackles(lesser_crackles(crinkle)) + crackles(CRACKLES)
    after_flicks = flutter() + flakes() + crackles(relaxing())
    sachet = slide() + after_flicks + bumps() + strain() + flicks() + held_film(handled)
    sachet = signal.sosfilt(signal.butter(3, LOWEST_HZ, "high", fs=SR, output="sos"), sachet)
    return background() + room(sachet) + sachet


def record(dry):
    """Full scale limits the peaks; a steep low-pass cuts the top."""
    lowpass = signal.ellip(10, 0.1, 80, CUTOFF_HZ, fs=SR, output="sos")
    return signal.sosfilt(lowpass, np.clip(dry, -1, 1))


dry = scene()
out = record(dry)
log_audio(out)
```